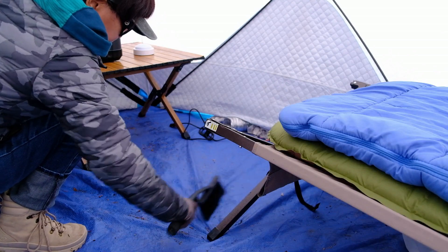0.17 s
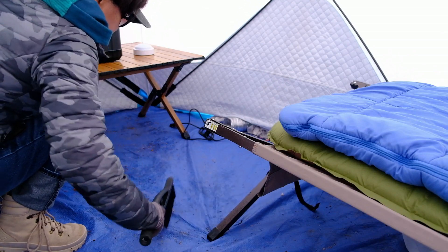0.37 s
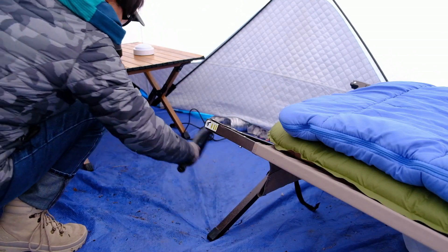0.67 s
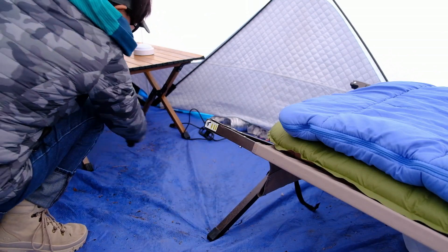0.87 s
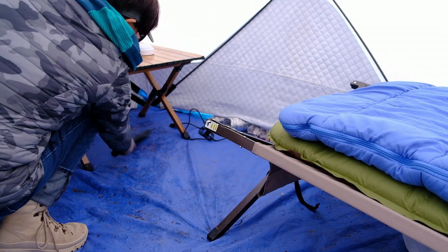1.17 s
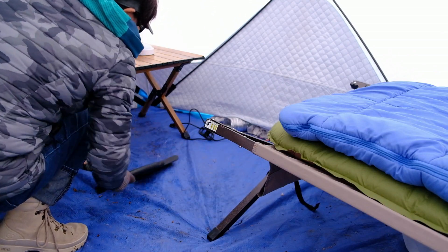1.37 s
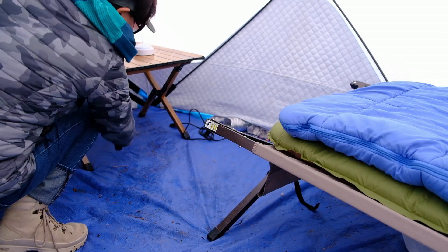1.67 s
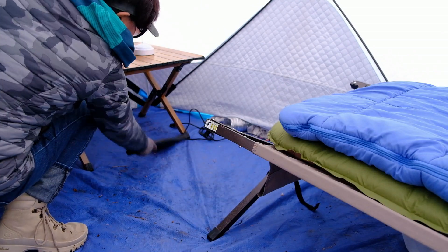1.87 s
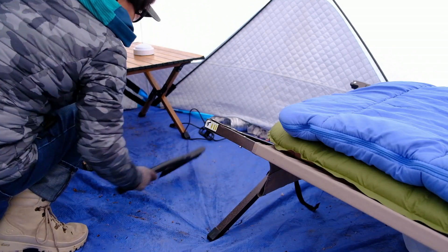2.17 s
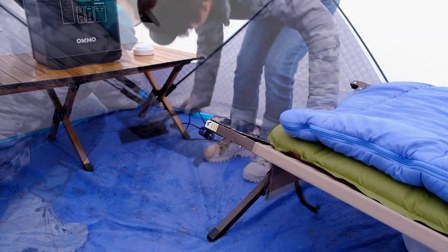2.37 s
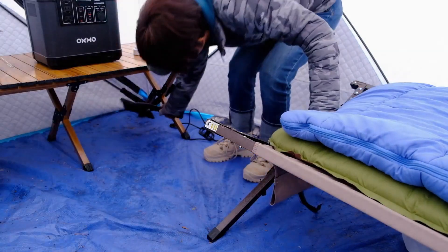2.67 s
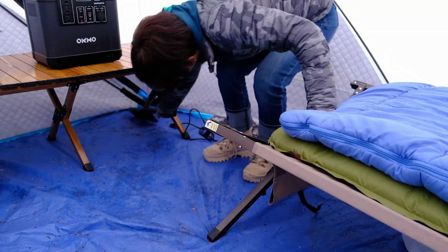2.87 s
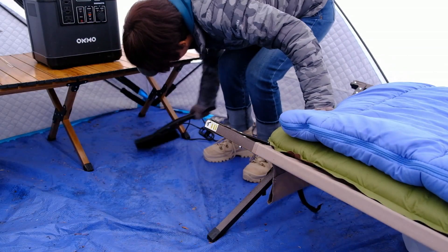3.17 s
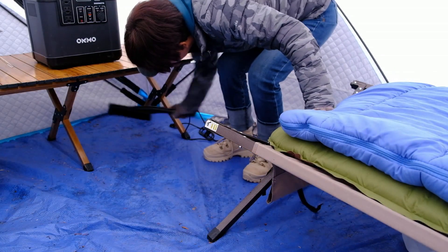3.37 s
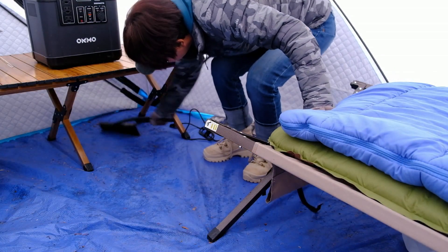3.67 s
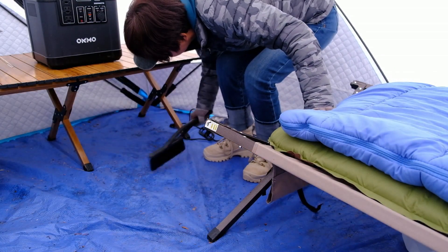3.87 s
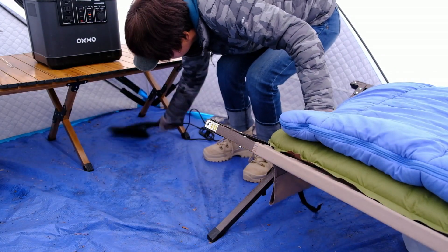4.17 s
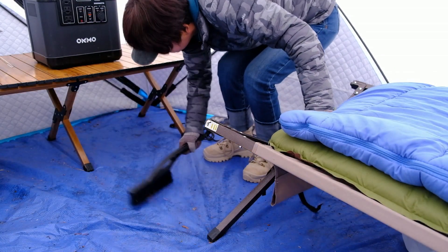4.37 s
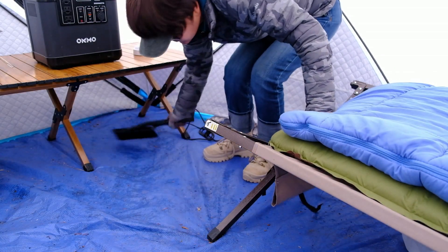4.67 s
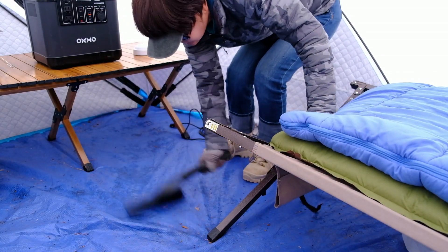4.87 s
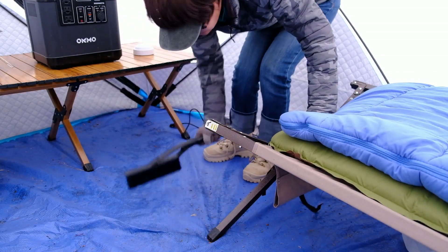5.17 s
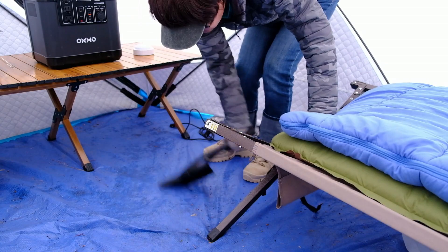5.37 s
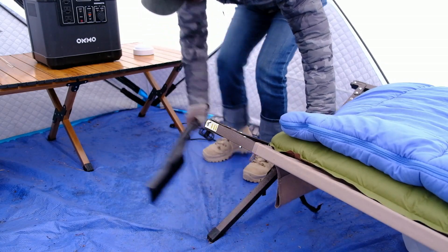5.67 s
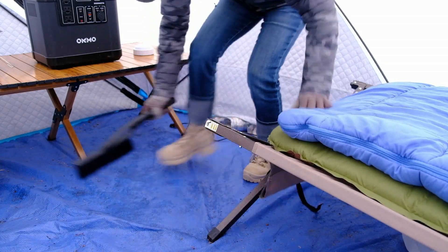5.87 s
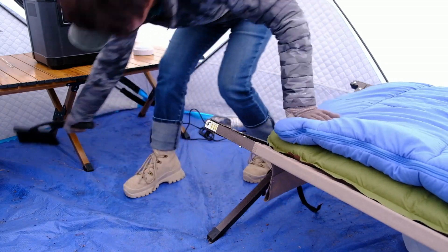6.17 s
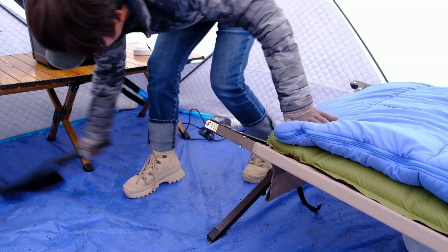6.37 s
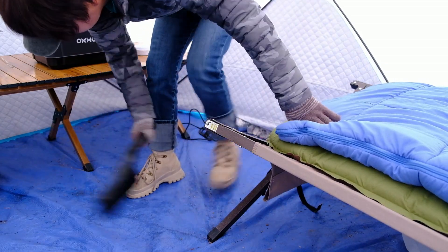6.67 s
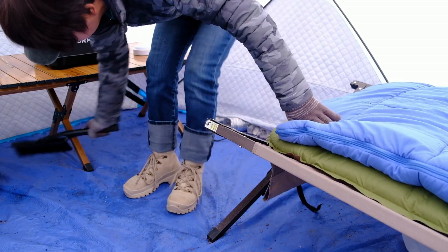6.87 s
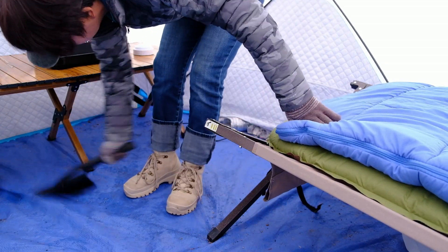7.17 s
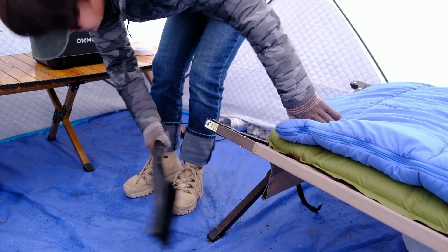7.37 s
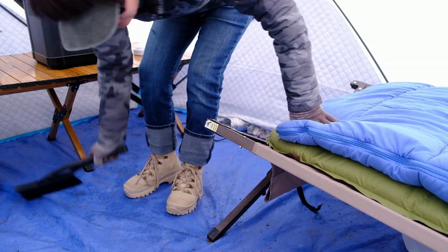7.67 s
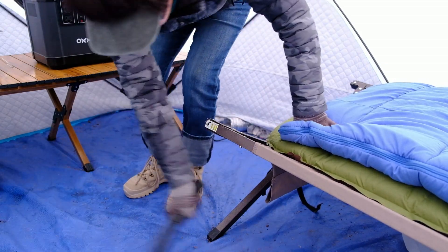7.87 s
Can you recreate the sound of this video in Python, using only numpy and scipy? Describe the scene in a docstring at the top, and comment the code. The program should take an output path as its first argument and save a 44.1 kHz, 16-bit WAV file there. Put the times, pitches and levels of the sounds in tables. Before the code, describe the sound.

Close, dry bristle scrapes sweep a crinkly plastic sheet inside a tent, with nylon rustling, sharp slaps, and a late footstep knocking something hollow.

```python
"""Inside a tent, close to the microphones, someone sweeps the plastic tarp floor with a small hand broom.
In a dozen quick strokes, thousands of random bristle flicks rasp over the weave and drum the pressed sheet.
At times the broom slaps down in a burst of such flicks. Nearby a padded nylon jacket rustles in clumped
crinkles, grit ticks as short ringing snaps, and boots or the broom head crunch and thud on the tarp, once
knocking something hollow that rings in a few modes. A faint outdoor hush of shaped noise lies behind."""
import sys
import numpy as np
from scipy import signal
from scipy.fft import rfft, irfft, next_fast_len
from scipy.io import wavfile
from scipy.ndimage import uniform_filter1d, map_coordinates

SR = 44100
rng = np.random.default_rng(int(sys.argv[2]) if len(sys.argv) > 2 else 0)


def digitize_waveform(pressure):
    """Quantize a signal to 16-bit integers and store it at the path in sys.argv[1].

    Rows of a 2-D input are taken as channels; values are limited to [-1, 1].
    """
    field = np.atleast_2d(pressure).T
    bounded = np.clip(field, -1, 1)
    quanta = np.round(bounded * 32767).astype(np.int16)
    wavfile.write(sys.argv[1], SR, quanta)


N = 353417
TIME = np.arange(N) / SR


def from_db(db):
    """Decibels to gain."""
    return 10 ** (np.asarray(db) / 20)


def rms_one(x):
    """Scale to rms 1."""
    return x / np.sqrt(np.mean(x ** 2) + 1e-20)


def in_time(rows):
    """Interpolate each column after the time column at every sample."""
    s, *columns = np.transpose(rows)
    return [np.interp(TIME, s, column) for column in columns]


def at_hz(points, hz):
    """Read a spectrum on a log-frequency axis."""
    f, value = np.transpose(points)
    return np.interp(np.log(np.maximum(hz, 1)), np.log(f), value)


def colour(x, spectrum):
    """Filter a signal by a spectrum of gains in dB."""
    size = next_fast_len(x.shape[-1])
    hz = np.arange(size // 2 + 1) * SR / size
    gain = from_db(at_hz(spectrum, hz))
    return irfft(rfft(x, size) * gain, size)[..., :x.shape[-1]]


def drift(per_s):
    """Random curve: straight lines between per_s knots a second, the knots of rms 1."""
    knots = rms_one(rng.standard_normal(8000))
    return np.interp(TIME * per_s, np.arange(len(knots)), knots)


def grains(per_s, spread_db, clump_db, clumps_per_s):
    """Tiny snaps of uneven size in clumps; rows are direct, scattered left, scattered right, signs at random."""
    born = rng.random(N) < per_s / SR
    uneven_db = spread_db * np.minimum(rng.exponential(1, N), 6)
    size_db = uneven_db + clump_db * drift(clumps_per_s)
    signs = rng.choice([-1, 1], (3, N))   # each path has its own echoes
    return rms_one(born * signs * from_db(size_db))


def bands(x, spectrum, count=14):
    """Colour x to rms 1 and split it into overlapping bands that add up again: (centre Hz, band)."""
    size = next_fast_len(N)
    whole = rfft(rms_one(colour(x, spectrum)), size)
    centres = np.geomspace(250, 13000, count)
    hz = np.arange(size // 2 + 1) * SR / size
    place = np.interp(np.log(hz + 1), np.log(centres), np.arange(count))
    split = []
    for k, centre in enumerate(centres):
        triangle = np.maximum(1 - abs(place - k), 0)
        split.append((centre, irfft(whole * triangle, size)[:, :N]))
    return split


def shelf(hz, none_hz, full_hz):
    """Share 0-1 of a tone change that reaches this frequency."""
    return np.clip(np.log(hz / none_hz) / np.log(full_hz / none_hz), 0, 1)


def burst(s, rise, hold, t60):
    """Envelope of one contact: it rises, holds and dies away by 60 dB in t60 seconds."""
    age = TIME - s
    attack = np.clip(age / rise + .5, 0, 1)
    return attack * from_db(-60 * np.clip((age - hold) / t60, 0, 3))


def ring(x, hz, t60):
    """A unit click sets a decaying sine of starting height 1 ringing."""
    r, w = np.exp(-np.log(1000) / (t60 * SR)), 2 * np.pi * hz / SR
    return signal.lfilter([0, np.sin(w)], [1, -2 * r * np.cos(w), r * r], x + 1e-18)


# the air outside, far behind the tent: (frequency [Hz], relative level [dB per Hz])
HUSH_SPECTRUM = [(20, 2), (45, 2.5), (90, -1), (170, -5.5), (260, 1.5), (380, -12.5), (700, -1),
                 (2000, -3.5), (8000, -8), (16000, -13)]
HUSH_DB = -53.5   # rms of the mid and side noises together


def outdoor_hush(hush_side=0.62):
    """Distant outdoor air as steady shaped noise, partly different at the two microphones."""
    mid, side = rms_one(colour(rng.standard_normal((2, N)), HUSH_SPECTRUM))
    return from_db(HUSH_DB) * np.array([mid + hush_side * side, mid - hush_side * side])


# the sweeper moves off to the right:
# (time [s], delay of the left microphone [ms], left-right level difference [dB])
SWEEPER_PLACE = [(0, .01, -0.5), (2.2, 0.016, -0.4), (3.3, 0.035, 0.2), (4.4, 0.052, 0), (8, 0.07, -0.3)]
# sound that comes straight to the microphones: (frequency [Hz], gain [dB])
DIRECT_PATH = [(1000, 1), (2000, 0.62), (4000, -2.5), (10000, -12.5)]
# sound that comes by way of floor, cot and walls: (frequency [Hz], gain [dB])
SCATTERED_PATHS = [(50, -20), (130, -42), (400, -48), (1000, -16), (2000, -2.5), (4000, 0.2), (10000, 1.5)]
TENT_T60_S, TENT_DB = .09, -15   # tail decay time, and level against the direct sound


def tent(paths):
    """Direct sound is a little late at the left; treble arrives mostly scattered; fabric walls add a brief tail."""
    delay_ms, pan_db = in_time(SWEEPER_PLACE)
    direct = colour(paths[0], DIRECT_PATH)
    scattered = colour(paths[1:], SCATTERED_PATHS)
    late = map_coordinates(direct, [np.arange(N) - delay_ms * SR / 1000], order=3)
    age = TIME[:SR // 4]
    wall = rng.standard_normal((2, len(age))) * (age > .003) * from_db(-60 * age / TENT_T60_S)
    wall = wall / np.linalg.norm(wall[0])
    tail = signal.fftconvolve(direct[None], wall, axes=1)[:, :N]
    heard = np.array([late, direct]) + scattered + from_db(TENT_DB) * tail
    return heard * from_db([pan_db / 2, -pan_db / 2])


def passing_echoes(paths, echo_db=-18.5, sway_ms=0.233, sways_per_s=3.0):
    """Table, cot and wall each throw back a short echo; its delay wanders at random, so the colour keeps changing."""
    out, at = paths, np.arange(N)
    for delay_ms in (1.7, 3.1, 5.3):
        read = at - (delay_ms + sway_ms * drift(sways_per_s)) * SR / 1000
        out = out + from_db(echo_db) * np.array([np.interp(read, at, path) for path in paths])
    return out / np.sqrt(1 + 3 * from_db(2 * echo_db))   # offsets the power the echoes add


# something hollow on the tent floor is hit under the last step: (time [s], level [dB])
KNOCK_HITS = [(6.833, -27), (6.845, -39), (6.873, -30.5)]
# the modes of the hollow body: (frequency [Hz], relative level [dB], t60 [s])
HOLLOW_MODES = [(155, -5, .15), (562, 1.5, 0.21), (590, -10, 0.18), (983, 1, 0.2), (1050, -4, 0.13),
                (2160, -13, .08), (2660, -7, .09)]


def knock():
    """Something hollow is jolted and rattles briefly; it is too small to radiate deep bass."""
    hits = np.zeros(N)
    for s, db in KNOCK_HITS:
        hits[int(s * SR)] = from_db(db)
    body = sum(from_db(db) * ring(hits, hz, t60) for hz, db, t60 in HOLLOW_MODES)
    return signal.sosfilt(signal.butter(2, 250, "high", fs=SR, output="sos"), body)


# grit and creases tick on the tarp: (time [s], relative level [dB], pitch [Hz])
GRIT_TICKS = [(0.403, -34, 1680), (0.806, -31, 1600), (0.921, -29, 1400), (3.2734, -37, 2380),
              (3.9527, -24, 1910), (4.0507, -23, 1850), (4.5176, -25, 2600), (4.9322, -23, 1500),
              (5.4994, -25.5, 2000), (6.0314, -35, 1940), (6.4652, -29, 2210), (7.318, -23, 1520),
              (7.357, -19, 2540), (7.3652, -17, 2760)]


def ticks(t60=0.0086, crackle=1.0, crackle_t60=0.0064, gain_db=4):
    """A grain or a crease snaps with a tiny crackle and rings for a few cycles."""
    age = TIME[:1024]
    out = np.zeros(N + len(age))
    for s, db, hz in GRIT_TICKS:
        snap = crackle * rng.standard_normal(len(age)) * from_db(-60 * age / crackle_t60)
        at = int(s * SR)
        out[at:at + len(age)] += from_db(db + gain_db) * (ring(age == 0, hz, t60) + snap)
    thin = signal.butter(2, [900, 7000], "band", fs=SR, output="sos")
    return signal.sosfilt(thin, out[:N])


# a boot lands or shifts on the tarp, or the broom head bumps the ground:
# (time [s], relative crunch level [dB], thud level [dB], crunch t60 [s])
FLOOR_STEPS = [(2.93, -23.5, -42, .16), (5.808, -22.5, -40.5, 0.41), (5.922, -30, -45, 0.2),
               (6.625, -30, -52, 0.13), (6.72, -27.5, -45, .2), (6.827, -14, -38.5, 0.17)]
# the crunch of the tarp: (frequency [Hz], relative level [dB per Hz])
CRUNCH_SPECTRUM = [(88, -43), (150, -9), (555, -2), (702, -3.5), (1020, -4), (1420, 1), (2100, 3),
                   (3160, 1.5), (9820, -15.5), (16000, -28)]
# the ground below: (frequency [Hz], relative level [dB per Hz])
THUD_SPECTRUM = [(30, -17), (70, -3), (150, -4.5), (300, -0.5), (600, -9), (1500, -40)]


def steps(crunch_db=-6.0, thud_db=0.0):
    """A sole or the broom head crushes the tarp and thuds on the ground below."""
    crushing = grains(per_s=20000, spread_db=.8, clump_db=.7, clumps_per_s=250)
    crunch = rms_one(colour(crushing, CRUNCH_SPECTRUM))
    thud = rms_one(colour(rng.standard_normal((3, N)), THUD_SPECTRUM))
    out = 0
    for s, db, low_db, t60 in FLOOR_STEPS:
        tread = burst(s, rise=.004, hold=.014, t60=t60)
        out = out + crunch * from_db(db + crunch_db) * tread
        out = out + thud * from_db(low_db + thud_db) * burst(s, rise=0.0083, hold=0.012, t60=0.12)
    return out


# the arm swings back between strokes:
# (time of fastest motion [s], speeding up [s], slowing down [s], relative rustle level [dB],
#  crumple: lows against rustle [dB], swish: treble against rustle [dB])
ARM_SWINGS = [(0.316, 0.15, 0.256, -41, -13.5, -16), (0.833, 0.33, 0.53, -41, -6, -5),
              (1.398, 0.057, 0.419, -43, -9.5, -14.7), (2.124, 0.143, 0.51, -41, -7.5, -11),
              (3.272, 0.367, 0.58, -38.5, -14.5, -9.5), (3.954, 0.32, 0.24, -33, -16.5, -13.2),
              (4.372, 0.05, 0.019, -29.5, -10.5, -17.5), (4.475, 0.097, 0.18, -30, -13, -12.5),
              (4.991, 0.11, 0.21, -30, -12, -14.5), (5.475, 0.067, 0.088, -37, -7, -13.8),
              (5.662, 0.17, 0.16, -34.5, -10, -12), (5.95, 0.08, 0.19, -39.5, -5, -12),
              (6.717, 0.25, 0.18, -32.5, -8, -8.2), (7.373, 0.19, 0.3, -33, -8.5, -13.5),
              (7.888, 0.047, 0.14, -31, -10, -13.5)]
SWING_DB = 9.0   # how much quieter the rustle is at either end of a swing


def swing_controls():
    """The rustle arches over each swing of the arm; its tone glides from one swing to the next."""
    arches = []
    for s, rise, fall, db, _, _ in ARM_SWINGS:
        away = (TIME - s) / np.where(TIME < s, rise, fall)
        arches.append(db - SWING_DB * away ** 2)
    *_, crumple_db, swish_db = in_time(ARM_SWINGS)
    return np.max(arches, axis=0), crumple_db, swish_db


# the padded jacket: (frequency [Hz], relative level [dB per Hz])
NYLON_SPECTRUM = [(40, -33), (100, -30.5), (270, -19), (400, -13.5), (600, -14), (1000, -6), (1600, 0),
                  (2500, 0.5), (5000, -9), (9000, -18.5), (16000, -29)]


def jacket(usual_crumple_db=-13, usual_swish_db=-15, patchy_db=0.86, snaps_db=-9, gain_db=-2.5, bunch_db=0.85):
    """Nylon folds rub and crinkle in small clumps as the arm moves, with a steady sprinkle of sharper snaps."""
    level_db, crumple_db, swish_db = swing_controls()
    crinkles = grains(per_s=9000, spread_db=1.0, clump_db=2.0, clumps_per_s=80)
    snaps = from_db(snaps_db) * grains(per_s=120, spread_db=2.5, clump_db=0.5, clumps_per_s=9.1)
    out = 0
    for hz, band in bands(crinkles + snaps, NYLON_SPECTRUM, count=8):
        folds = (crumple_db - usual_crumple_db) * shelf(hz, none_hz=1860, full_hz=730)
        swish = (swish_db - usual_swish_db) * shelf(hz, none_hz=2780, full_hz=8500)
        out = out + band * from_db(folds + swish + patchy_db * drift(per_s=54))
    bunching = bunch_db * drift(per_s=30)   # the fabric bunches and lets go
    return out * from_db(level_db + gain_db + bunching)


# the broom slaps down on the tarp or catches a fold:
# (time [s], relative level [dB], ring-out t60 [s], contact [s])
BROOM_SLAPS = [(0.674, -34.5, 0.06, 0.0066), (1.635, -37, .07, .008), (2.311, -19, 0.088, 0.012),
               (3.025, -20.5, 0.07, .012), (3.397, -15, 0.097, 0.0049), (4.007, -19.5, 0.087, 0.011),
               (4.087, -21.5, 0.074, 0.0085), (5.121, -33, 0.07, 0.013), (6.097, -24.5, 0.15, 0.01),
               (6.491, -29.5, 0.059, 0.008)]
# bristles landing on the tarp: (frequency [Hz], relative level [dB per Hz])
SLAP_SPECTRUM = [(30, -14), (90, -19.5), (350, -12.5), (900, -10.5), (1700, -0.5), (2200, 4), (3000, -4.5),
                 (5000, -5), (10000, -19.5), (16000, -23)]


def slaps(gain_db=-3.0):
    """The bristles land within a few milliseconds of each other."""
    landings = grains(per_s=18000, spread_db=1.0, clump_db=.8, clumps_per_s=300)
    patter = rms_one(colour(landings, SLAP_SPECTRUM))
    out = 0
    for s, db, t60, hold in BROOM_SLAPS:
        out = out + from_db(db + gain_db) * burst(s, rise=.005, hold=hold, t60=t60)
    return patter * out


# every stroke swells as the bristles spread, and eases into its peak
SWELL_DB, SWELL_CURVE = 21.5, 1.6
# the tips start bright and dull as they bend and the rasp sags
TIP_BITE_DB, DULL_DB_PER_OCTAVE = 3.5, 6.5
# the hand eases off the sheet over the drag, and a flick of the wrist ends it
EASE_OFF_DB, FLICK_S = 7, 0.031
# the flick presses the tips flat, so the treble misses this share of it
FLICK_DULL_SHARE = 0.27


def stroke(age, swell, drag, lift, peak_db, fade_db, press_db, bite_db, rasp_hz, sag, flick_db):
    """Level, pressure, bite and rasp centre as the bristles swell, drag and bend, flick and lift off."""
    after_drag = age - swell - drag
    upright = np.clip(1 - age / swell, 0, 1)
    bent = np.clip((age - swell) / drag, 0, 1)
    flick = flick_db * np.exp(-(after_drag / FLICK_S + 1) ** 2)
    lift_off = 20 * np.maximum(after_drag / lift, 0)
    level_db = peak_db - SWELL_DB * upright ** SWELL_CURVE - fade_db * bent + flick - lift_off
    sunk = sag * bent ** 2
    pressure = press_db - EASE_OFF_DB * bent ** 2
    bite = bite_db + TIP_BITE_DB * upright - DULL_DB_PER_OCTAVE * sunk - FLICK_DULL_SHARE * flick
    return np.array([level_db, pressure, bite, rasp_hz * 2 ** -sunk])


# one row per pass or light touch of the broom:
# (start time [s], swell [s], drag [s], lift-off by 20 dB [s], relative scrape level [dB],
#  fade over the drag [dB], pressure: lows against scrape [dB], bite: treble against scrape [dB],
#  starting rasp centre [Hz], sag of the rasp over the drag [octaves], closing flick [dB])
BROOM_STROKES = [(0.0, 0.082, 0.157, 0.053, -23.0, 6, -21, -6.5, 2820, 0.57, -0.7),
                 (0.96, 0.13, 0.1, 0.08, -34.5, 1, -21, -3, 3000, 0, 0.5),
                 (1.11, 0.11, 0.091, 0.078, -25, 7.5, -22, -7.5, 2630, 0.1, 1.6),
                 (1.643, 0.22, 0.1, 0.065, -24.5, 1.9, -24.5, -8.5, 2680.0, 0.07, 2.1),
                 (2.308, 0.17, 0.136, 0.013, -22, -0.5, -21.5, -7, 2870, 0.64, -0.5),
                 (2.679, 0.029, 0.032, 0.049, -39.5, 7, -13.4, -9, 1955, 0.32, 1.5),
                 (2.739, 0.027, 0.012, 0.077, -36, 1.3, -16.5, -7, 2830.0, 0.097, -0.5),
                 (2.854, 0.12, 0.077, 0.035, -27.5, -0.5, -11.5, -3.5, 2680, 0.35, 1),
                 (3.047, 0.0097, 0.027, 0.06, -36.5, 3, -7, -4.0, 3000.0, 0, 1),
                 (3.434, 0.2, 0.112, 0.056, -23, 9.8, -17, -3.5, 2510, 0.04, 6.1),
                 (4.02, 0.081, 0.141, 0.075, -21, 4, -16, -6.5, 2300, 0.46, 2.0),
                 (4.568, 0.024, 0.019, 0.101, -31.5, 3.3, -15.1, -7.5, 2760.0, 0, -0.5),
                 (4.621, 0.071, 0.11, 0.054, -20, 1, -17, -8, 2330, 0.83, 0.4),
                 (5.103, 0.023, 0.02, 0.081, -30, 0, -21, -11.5, 2410, 0, 1),
                 (5.188, 0.086, 0.082, 0.041, -19.5, 1, -20.5, -8, 2700, 0.48, 1),
                 (6.111, 0.12, 0.117, 0.035, -20.5, 5.5, -16, -7, 2200, 0.69, 6),
                 (6.477, 0.026, 0.065, 0.11, -34, 4.5, -18, -4.5, 1860.0, 0, 2),
                 (6.879, 0.15, 0.1, 0.044, -21, 2.5, -15, -7.5, 2120, 0.48, 2.0),
                 (7.517, 0.13, 0.13, 0.045, -20.5, 4.5, -17, -9, 2100, 0.49, 4),
                 (7.912, 0.06, 0.033, 0.042, -35, -0.5, -15.5, -9, 2080.0, 0.24, 0.5)]


def stroke_controls():
    """The strokes in a row; where two overlap, the stronger one leads."""
    controls = np.tile([[-150.], [0], [0], [2000]], N)   # silent where no stroke plays
    for start, *shape in BROOM_STROKES:
        span = (TIME >= start) & (TIME < start + 1)
        new, old = stroke(TIME[span] - start, *shape), controls[:, span]
        controls[:, span] = np.where(new[0] > old[0], new, old)
    return controls


# bristles on the tarp weave: (frequency [Hz], relative level [dB per Hz])
SCRAPE_SPECTRUM = [(30, -40), (60, -21), (120, -13.5), (280, -6.5), (380, -10), (500, -5), (750, -4.5),
                   (1500, -3), (2300, -3.5), (4000, -2), (6000, -1.5), (9500, -3), (13000, -7.5),
                   (16000, -16.5)]


def broom(usual_press_db=-16, usual_bite_db=-7, rasp_db=7.0, rasp_octaves=0.7, slack_db=5.0, patchy_db=3.0,
          flap_db=1.5, grit_db=-13, gain_db=0.5, flex_s=0.014, judder_db=0.76):
    """Thousands of bristle tips flick over the weave; pressure drums the sheet, and the rasp sinks as they bend."""
    level_db, press_db, bite_db, rasp_hz = stroke_controls()
    contact = uniform_filter1d(from_db(level_db + gain_db), max(1, int(flex_s * SR)))
    judder = judder_db * drift(per_s=35)   # the bristles catch on wrinkles and slip free
    flicks = grains(per_s=24000, spread_db=1.1, clump_db=0.53, clumps_per_s=150)
    grit = from_db(grit_db) * grains(per_s=700, spread_db=0.0, clump_db=2.0, clumps_per_s=81)
    flap = flap_db * drift(per_s=41)   # the loose sheet lifts and drops under the broom
    out, rasp_pitch = 0, np.log2(rasp_hz)
    for hz, band in bands(flicks + grit, SCRAPE_SPECTRUM):
        drumming = (press_db - usual_press_db) * shelf(hz, none_hz=2200, full_hz=720)
        sheet = drumming + flap * shelf(hz, none_hz=800, full_hz=250)
        tips = (bite_db - usual_bite_db) * shelf(hz, none_hz=3000, full_hz=8800)
        rasp = rasp_db * np.exp(-.5 * ((np.log2(hz) - rasp_pitch) / rasp_octaves) ** 2)
        # bent bristles drag the sheet along
        slack = slack_db * (np.log2(2400) - rasp_pitch) * np.exp(-np.log2(hz / 950) ** 2 / 1.1)
        # each fold rings differently
        creases = patchy_db * drift(per_s=33) * shelf(hz, none_hz=8900, full_hz=2000)
        out = out + band * from_db(sheet + tips + rasp + slack + creases)
    return out * contact * from_db(judder)


def scene(near_db=0.0):
    """The sweeper in the tent, over a faint outdoor hush."""
    hush = outdoor_hush()
    paths = passing_echoes(broom() + jacket()) + slaps() + steps()
    paths[0] += knock() + ticks()   # small sources are heard directly
    return from_db(near_db) * tent(paths) + hush


# tone of the left channel against the right: (frequency [Hz], level difference [dB])
CHANNEL_TILT = [(500, -1), (1200, 0.5), (2200, -2.1), (4000, 1.1), (9000, 0.9)]
# side level by frequency: (frequency [Hz], side gain [dB])
SIDE_LEVEL = [(8300, 0), (9800, -11), (16000, -12)]
CUTOFF_HZ = 15900


def record(dry):
    """The two channels differ a little in tone; the highest treble sits near the centre, and the top is cut."""
    left = colour(dry[0], [(hz, db / 2) for hz, db in CHANNEL_TILT])
    right = colour(dry[1], [(hz, -db / 2) for hz, db in CHANNEL_TILT])
    mid = (left + right) / 2
    side = colour((left - right) / 2, SIDE_LEVEL)
    low_pass = signal.ellip(12, .1, 80, CUTOFF_HZ, fs=SR, output="sos")
    return signal.sosfilt(low_pass, np.array([mid + side, mid - side]))


dry = scene()
out = record(dry)
digitize_waveform(out)
```